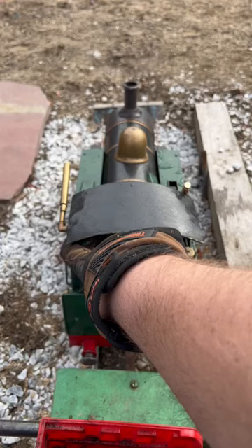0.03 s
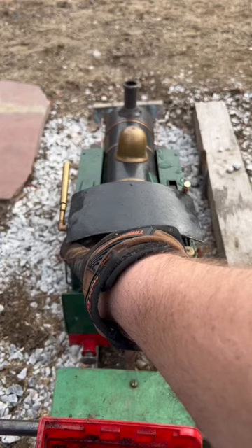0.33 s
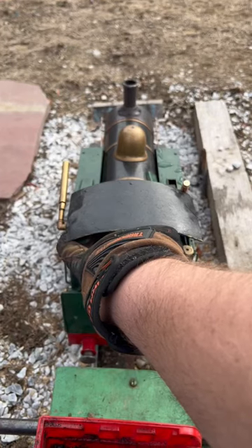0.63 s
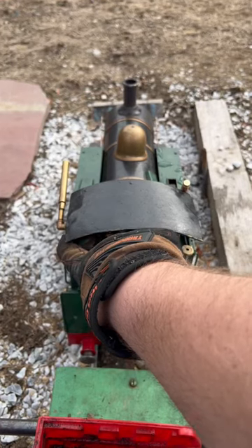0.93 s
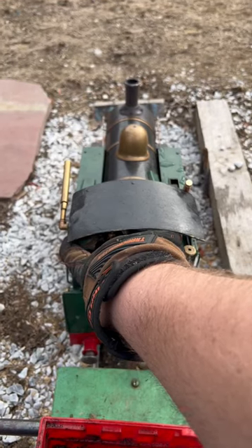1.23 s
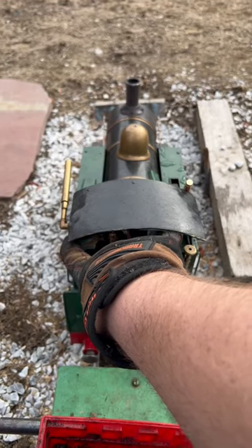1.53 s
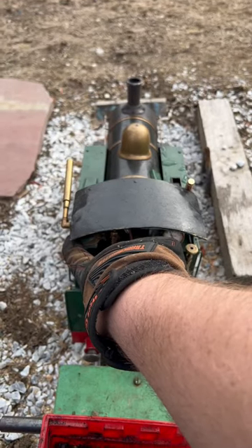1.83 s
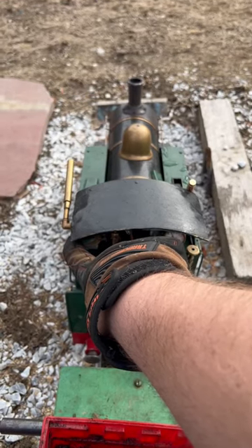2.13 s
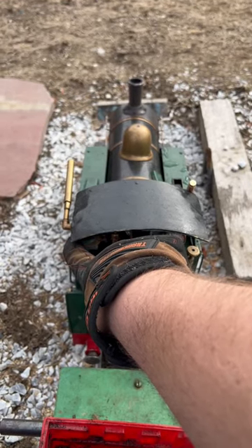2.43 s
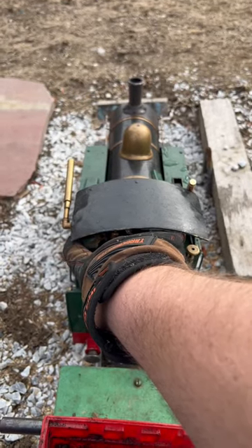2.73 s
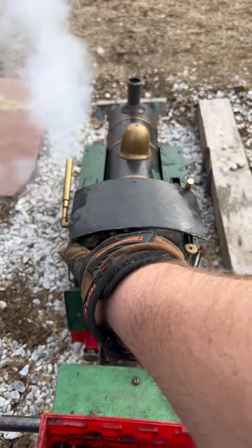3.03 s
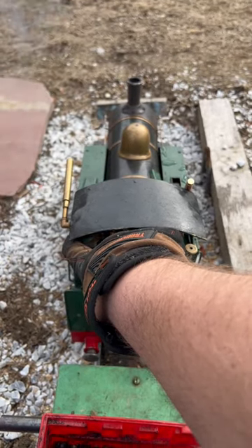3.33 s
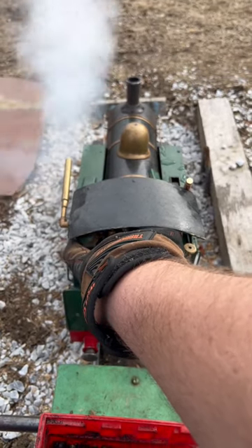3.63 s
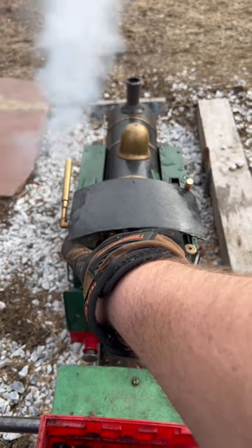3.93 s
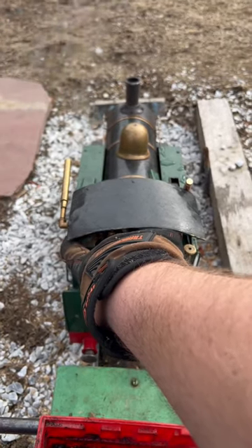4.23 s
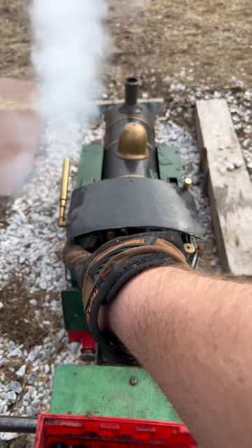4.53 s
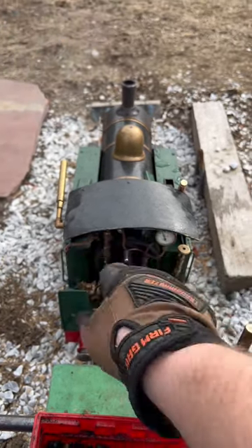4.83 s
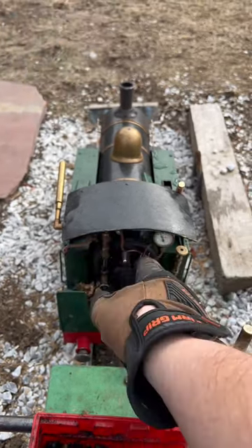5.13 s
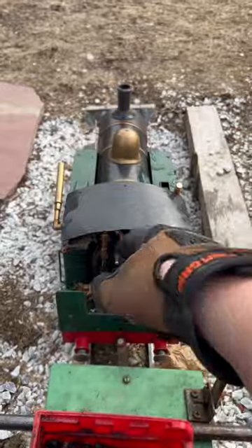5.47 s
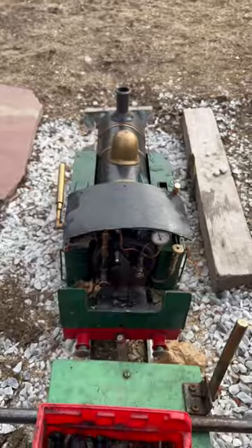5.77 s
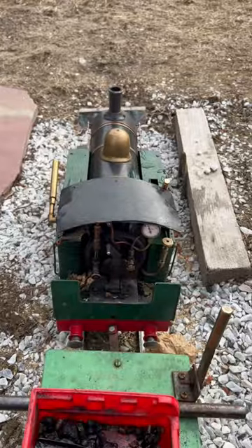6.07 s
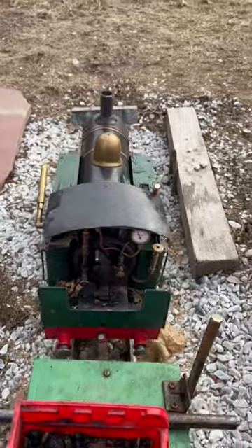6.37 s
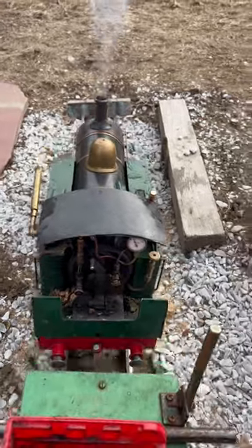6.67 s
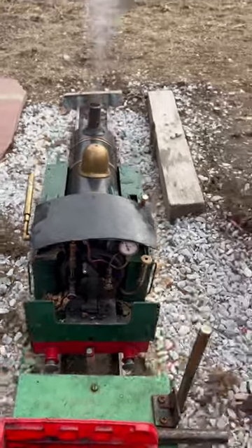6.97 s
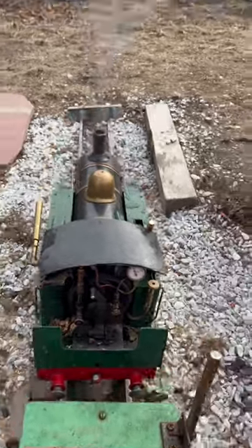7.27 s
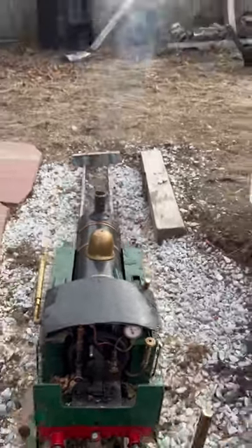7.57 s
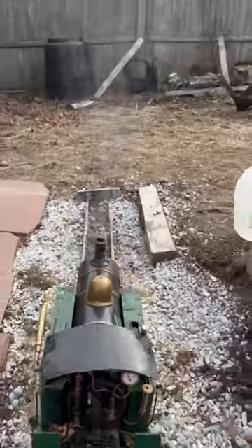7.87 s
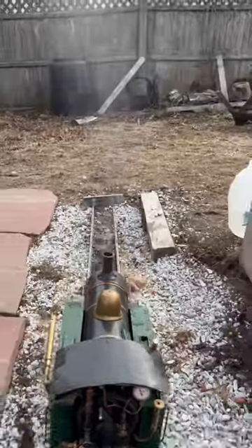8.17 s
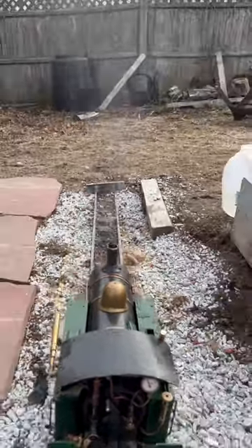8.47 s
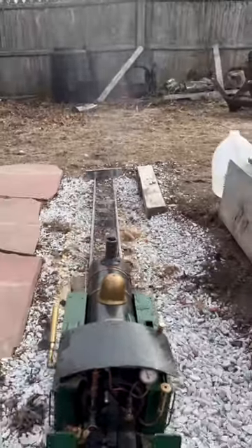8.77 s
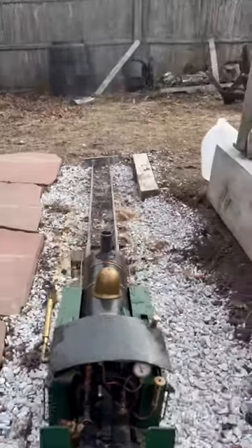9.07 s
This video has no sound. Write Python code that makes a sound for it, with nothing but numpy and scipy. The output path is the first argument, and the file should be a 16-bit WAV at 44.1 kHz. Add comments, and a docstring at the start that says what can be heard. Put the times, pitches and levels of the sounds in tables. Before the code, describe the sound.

A small steam locomotive gives three hissy, spluttering whistle blasts, then moves off with quickening chuffs.

```python
"""Back yard, from the driver's seat of a small live-steam locomotive: steam leaks, the fire draws.
Three pulls on a wet, overblown whistle each give a pip, a squeak and a spluttering breathy note
inside a loud hiss. Then the regulator opens: the chimney roars and the exhaust beats, in uneven
pairs, quicken as the engine moves off."""
import sys
import numpy as np
from scipy import signal
from scipy.fft import rfft, irfft, next_fast_len
from scipy.io import wavfile

SR = 44100
rng = np.random.default_rng(int(sys.argv[2]) if len(sys.argv) > 2 else 0)


def wav_record(signal):
    """Record a signal, one row per channel, as 16-bit PCM in the file named by sys.argv[1]."""
    frames = np.transpose(np.atleast_2d(signal))
    bounded = np.clip(frames, -1, 1)
    # unit amplitude maps onto the largest positive 16-bit level
    quanta = np.round(bounded * 32767).astype(np.int16)
    wavfile.write(sys.argv[1], SR, quanta)


N = 405719
T = np.arange(N) / SR
F = np.maximum(np.fft.rfftfreq(next_fast_len(N), 1 / SR), 1)

# whistle valve: (opens [s], water clears [s], shuts [s], flow level [dB])
PULLS = [(2.816, 2.885, 3.181, -25), (3.477, 3.53, 3.936, -24.3), (4.315, 4.395, 4.645, -24.5)]
LOW_MODE_HZ, HIGH_MODE_HZ = 1750, 4200  # whistle pipe


def undb(db):
    """Decibels to gain."""
    return 10 ** (np.asarray(db) / 20)


def curves(rows):
    """Table columns interpolated over time."""
    time_s, *columns = np.transpose(rows)
    return [np.interp(T, time_s, column) for column in columns]


def colour(points, modes=()):
    """Gain over frequency: broad spectrum plus narrow peaks and dips."""
    hz, db = np.transpose(points)
    broad_db = np.interp(np.log(F), np.log(hz), db)
    modes_db = sum(peak_db / (1 + (2 * (F - f) / width_hz) ** 2) for f, width_hz, peak_db in modes)
    return undb(broad_db + modes_db)


def shaped(x, gain):
    """Filter by a gain over frequency."""
    size = next_fast_len(N)
    return irfft(rfft(x, size) * gain, size)[..., :N]


def turbulence(gain):
    """Coloured stereo noise, rms 1: mono in the bass, wide in the treble."""
    # stereo width: (frequency [Hz], side minus mid [dB])
    width = [(90, -39), (380, -24.5), (700, -2), (1200, -15.5), (2400, -20), (4500, -3), (6800, -19),
             (8500, -8.5), (11500, 6), (13000, 42)]
    spread = colour(width)
    split = np.array([np.ones_like(spread), spread]) / np.hypot(1, spread)
    mid, side = shaped(rng.standard_normal((2, N)), gain * split)
    pair = np.array([mid + side, mid - side])
    return pair / pair.std()


def walk(rate_hz):
    """Smooth random drift, standard deviation 1."""
    x = shaped(rng.standard_normal(N), 1 / (1 + (F / rate_hz) ** 2))
    return x / x.std()


def ramp(t, rise_s):
    """Smooth 0-to-1 step from t = 0."""
    return np.sin(np.pi / 2 * np.clip(t / rise_s, 0, 1)) ** 2


def yard(x, near_db, far_db, near_t60_s, far_t60_s):
    """Nearby gravel scatters a short echo; fence and house return a thin, longer one."""
    t = T[:SR]
    tails = undb([-60 * t / near_t60_s, -60 * t / far_t60_s]) * ramp(t, rise_s=.008)
    near, far = tails / np.linalg.norm(tails, axis=1, keepdims=True)
    scatter = rng.standard_normal((2, SR)) * np.hypot(undb(near_db) * near, undb(far_db) * far)
    echo = signal.fftconvolve(x, scatter, axes=1)[:, :N]
    stone_hz, dull_hz = 750, 8000  # long waves pass small stones unscattered
    return x + shaped(echo, 1 / np.hypot(1, F / dull_hz) / np.hypot(1, stone_hz / F))


def simmer():
    """Steam leak, fire drawing through the flue, low hum, distant rumble."""
    # engine at rest: (time [s], leak [dB], hum [dB])
    levels = [(0, -58, -61.5), (2.1, -56.5, -63), (2.7, -56.5, -68.5), (4.2, -59.5, -72.5), (6.2, -59, -77)]
    # spectra: (frequency [Hz], level [dB])
    leak_spectrum = [(500, -21), (1500, -21.5), (2100, -15.5), (3000, -13), (4200, -8), (5500, -11),
                     (6250, -5), (7600, -9.5), (9000, -15.5), (10000, -26), (11200, -16), (15500, -30)]
    rumble_spectrum = [(20, -26.5), (45, -0.5), (90, 0), (160, -9), (500, -17), (2000, -50.5)]
    flue_spectrum = [(100, -8.5), (220, -10.5), (310, 4.5), (380, 3), (470, -15), (650, -26.5),
                     (2000, -42.5)]
    # leak peaks and dip: (frequency [Hz], width [Hz], gain [dB])
    leak_modes = [(2680, 260, 7.5), (3254, 500, -11), (3605, 220, 10), (6270, 440, 4.5)]
    leak_db, hum_db = curves(levels)
    leak = undb(leak_db + .4 * walk(rate_hz=6)) * turbulence(colour(leak_spectrum, leak_modes))
    draught = undb(-66.3 + 1.7 * walk(rate_hz=14)) * turbulence(colour(flue_spectrum))
    hum_rms = undb(hum_db + walk(rate_hz=4))
    hum_hz = 65 * (1 + .012 * walk(rate_hz=3))
    hum = np.sqrt(2) * hum_rms * np.sin(2 * np.pi * np.cumsum(hum_hz) / SR)
    rumble = undb(-66.5) * turbulence(colour(rumble_spectrum))
    return leak + draught + hum + rumble


def bumps():
    """Dull, quickly damped knocks at the controls."""
    # (time [s], pitch [Hz], relative level [dB], decay [s])
    knocks = [(1.881, 330, -48.5, .010), (2.207, 62.3, -49, 0.023), (2.434, 94, -42, 0.0082),
              (2.451, 69, -46, .018), (4.898, 358, -51, 0.03), (5.568, 339.6, -59.5, .015),
              (6.203, 300, -47, 0.0078)]
    out = np.zeros(N)
    for at_s, hz, db, decay_s in knocks:
        start = int(at_s * SR)
        t = T[start:] - at_s
        envelope = 2 * undb(db) * ramp(t, rise_s=.0065) * np.exp(-t / decay_s)
        out[start:] += envelope * np.sin(2 * np.pi * hz * t)
    return out * (1 + .5 * walk(rate_hz=120))


def beat_envelopes():
    """Each exhaust beat is a sharp puff and a slower tug at the fire."""
    # (time [s], level [dB])
    beats = [ (6.509, -44), (6.649, -42), (6.853, -46), (6.955, -43), (7.132, -46.5), (7.242, -37),
             (7.415, -39), (7.469, -37), (7.597, -36), (7.671, -33.5), (7.777, -33.5), (7.83, -37.5),
             (7.944, -35.5), (8.042, -36), (8.168, -36), (8.243, -33), (8.355, -36.5), (8.441, -30.5),
             (8.571, -34), (8.66, -31.5), (8.798, -31.5), (8.876, -29), (9.004, -30), (9.089, -29)]
    # the four strokes of a wheel turn empty at different speeds: (decay [s])
    decays_s = [.034, .028, .046, .031]
    puffs, tugs = np.zeros((2, N))
    for stroke, (at_s, db) in enumerate(beats):
        start = int(at_s * SR)
        t = T[start:] - at_s
        puffs[start:] += undb(db) * ramp(t, rise_s=.005) * np.exp(-t / decays_s[stroke % 4])
        tugs[start:] += undb(db - 8.5) * ramp(t, rise_s=.025) * np.exp(-t / .075)
    return puffs, tugs


def exhaust():
    """Puffs ring the chimney, steam blows through between beats, the flue roars."""
    # regulator open: (time [s], relative roar [dB], relative blow-through [dB])
    levels = [(6.42, -44.5, -54), (6.68, -39.5, -52), (7.35, -42, -48), (7.65, -44.5, -43.5),
              (8.1, -44, -44.5), (8.3, -40.5, -40.3), (8.54, -43, -42.5), (8.7, -36.5, -41.5),
              (9.2, -37, -40)]
    # spectra: (frequency [Hz], level [dB])
    puff_spectrum = [(35, -2), (100, 7.5), (600, -3), (1000, -2.5), (2000, -4), (3000, -5), (4000, 0.5),
                     (5000, -5), (6500, -2.5), (7600, -8), (9200, -16), (11000, -10), (12500, -17),
                     (15500, -22)]
    blow_spectrum = [(35, -4), (100, 1.5), (700, 9.5), (1500, 4), (2200, 2.5), (3000, -1.5), (4000, -3),
                     (5500, -2.5), (6600, -8.5), (7600, -9.5), (8800, -13), (9800, -18), (11300, -11),
                     (12500, -17), (15500, -18)]
    rush_spectrum = [(100, -1), (700, 1), (1500, -2.5), (2200, -1), (2900, -9), (3500, -4), (4100, 5.5),
                     (5400, -7), (6600, 2.5), (7400, -8), (7900, -4), (8900, -12), (9700, -22),
                     (11300, -16), (13000, -28)]
    roar_spectrum = [(30, -46), (45, -24), (70, -16.5), (120, -15), (200, -12), (290, -1), (400, 0.5),
                     (470, -11.5), (580, -23.5), (1000, -29.5), (3000, -97)]
    # chimney modes under puffs, and peaks of the steady blow-through: (frequency [Hz], width [Hz], gain [dB])
    puff_modes = [(770, 100, 8.5), (1090, 160, 5), (1600, 160, 4.5), (2240, 150, 7.5), (2370, 58, -4.5),
                  (2780, 230, 7.5), (3130, 160, 9.5), (3490, 81, -6.5), (3795, 250, 9), (4120, 160, 5),
                  (4650, 220, 8), (5820, 220, 7), (6430, 200, 6)]
    blow_modes = [(2750, 200, 3), (3070, 170, 7), (3350, 200, -6), (3730, 200, 8), (4080, 150, 10),
                  (6660, 220, 11.5), (7850, 250, 5), (8750, 300, 5)]
    open_s, fill_s = 6.229, .16
    roar_db, blow_db = curves(levels)
    regulator = ramp(T - open_s, rise_s=.0067)
    puffs, tugs = beat_envelopes()
    chuffs = puffs * undb(walk(rate_hz=56)) * turbulence(colour(puff_spectrum, puff_modes))
    through_flow = regulator * undb(blow_db - 1.5 + walk(rate_hz=140))
    blow = through_flow * turbulence(colour(blow_spectrum, blow_modes))
    # steam rushes into the cold cylinders, fading as they fill
    filling = regulator * undb(-39.5) * np.exp(-(np.maximum(T - open_s, 0) / fill_s) ** 2)
    rush = filling * turbulence(colour(rush_spectrum))
    # every flow up the chimney adds draught
    draught = np.sqrt((regulator * undb(roar_db - 1)) ** 2 + tugs ** 2 + (1.05 * filling) ** 2)
    roar = draught * undb(.85 * walk(rate_hz=20)) * turbulence(colour(roar_spectrum))
    return chuffs + blow + rush + roar


def whistle_jet():
    """Steam hisses over the lip at once; breathy pipe resonances join once the water is blown out."""
    # bare jet and pipe-coloured breath: (frequency [Hz], level [dB])
    jet_spectrum = [(100, -18.5), (300, -18.5), (520, -24), (1000, -13), (1400, -11), (2200, -6),
                    (3500, 2.5), (4400, -1), (5500, 3.5), (7000, -1.5), (9000, -1), (10800, 1.5),
                    (12200, 1), (12900, -8.5), (15500, -13.5)]
    breath_spectrum = [(700, -43), (1600, -19), (2100, -8), (2700, 5), (3300, -8.5), (4500, -16),
                       (5700, -4.5), (7100, -3), (8200, -8), (10000, -10.5), (13000, -18)]
    # upper pipe resonances and gaps between: (frequency [Hz], width [Hz], gain [dB])
    modes = [(5830, 270, 11.3), (6620, 240, 13), (7110, 300, 9), (7960, 240, 11)]
    dips = [(2170, 120, -4), (4370, 160, -3), (6330, 190, -9), (7520, 200, -7), (9500, 400, -4)]
    flow, breath = 0, 0
    for opens_s, clears_s, shuts_s, db in PULLS:
        closing = np.exp(-np.maximum(T - shuts_s, 0) / .009)
        valve = undb(db) * ramp(T - opens_s + .005, rise_s=.028) * closing
        flow += valve
        breath += valve * ramp(T - clears_s, rise_s=.057)
    hiss = undb(-5.5 + .9 * walk(rate_hz=40)) * flow * turbulence(colour(jet_spectrum, dips))
    breath *= undb(-3.8 + 2.2 * walk(rate_hz=35))
    return hiss + breath * turbulence(colour(breath_spectrum, modes + dips))


def pipe(hz, gain, max_rough=1):
    """Pipe tone: the weaker it is, the looser its lock and the more eddies and droplets roughen it."""
    flutter, rasp, upper_flutter = (
        (walk(rate_hz) + 1j * walk(rate_hz)) / np.sqrt(2) for rate_hz in (220, 560, 260))
    locked_db, rasp_gain, upper_ratio, upper_db = -16, .55, 2.45, -10
    weakness_db = np.maximum(locked_db - 20 * np.log10(gain + 1e-9), 0)
    rough = np.minimum(.14 + .07 * weakness_db, max_rough)
    jitter = (.010 + .015 * rough) * walk(rate_hz=240)
    phase = 2 * np.pi * np.cumsum(hz * (1 + jitter)) / SR
    shake = (flutter + rasp_gain * rasp) / np.hypot(1, rasp_gain)
    tone = (np.sqrt(1 - rough ** 2) + rough * shake) * np.exp(1j * phase)
    # a loose lock lets an inharmonic mode ring above the lower notes
    upper = rough * upper_flutter * np.exp(1j * upper_ratio * phase) / np.hypot(1, (hz / 3200) ** 8)
    return np.sqrt(2) * gain * (tone + undb(upper_db) * upper).real


def mode_envelope(at_s, length_s, hz, ring_s=.004):
    """A mode grows per cycle, so low ones speak slowly; it saturates, holds, rings down."""
    growth_cycles = 4.5
    growth = .5 + .5 * np.tanh((T - at_s - .003) * hz / (2 * growth_cycles))
    return growth * np.exp(-np.maximum(T - at_s - length_s, 0) / ring_s)


def squeaks():
    """Full pressure overblows the pipe: each squeak starts sharp and sags."""
    # (time [s], length [s], first pitch [Hz], settled pitch [Hz], level [dB])
    overblows = [(2.836, .014, 3720, 3510, -8.5), (3.495, .014, 4300, 3270, -10),
                 (4.331, .013, 3850, 3330, -12), (4.363, .015, 3310, 3200, -14)]
    sag_s = .0055
    hz, gain = np.full(N, float(HIGH_MODE_HZ)), 0
    for at_s, length_s, first_hz, settled_hz, db in overblows:
        sag_hz = settled_hz + (first_hz - settled_hz) * np.exp(-np.maximum(T - at_s, 0) / sag_s)
        hz = np.where(T > at_s - sag_s, sag_hz, hz)
        gain += undb(db) * mode_envelope(at_s, length_s, settled_hz, ring_s=.009)
    return pipe(hz, gain)


def held_notes(choked):
    """The main note sinks as the pipe clears and drops out where water chokes it."""
    # one curve per pull: (time [s], pitch [Hz], level [dB])
    notes = [
        [(2.918, 2880, -26), (2.936, 2880, -24), (2.946, 2900, -36), (2.988, 2710, -27), (3.022, 2480, -29),
         (3.038, 2510, -18), (3.068, 2480, -31), (3.104, 2420, -17), (3.18, 2460, -21)],
        [(3.558, 2860, -29), (3.582, 2880, -19), (3.592, 2880, -32), (3.606, 2940, -21), (3.624, 2530, -33),
         (3.666, 2380, -16), (3.676, 2440, -29), (3.746, 2560, -17), (3.808, 2400, -24), (3.818, 2400, -16),
         (3.85, 2450, -26), (3.935, 2760, -25)],
        [(4.405, 3030, -30), (4.409, 3040, -27), (4.427, 2860, -40), (4.447, 2690, -27), (4.507, 2660, -23),
         (4.537, 2600, -28), (4.551, 2590, -22), (4.569, 2540, -32), (4.587, 2240, -36), (4.597, 2280, -25),
         (4.645, 2250, -21)],
    ]
    hz, gain = np.full(N, float(LOW_MODE_HZ)), 0
    for (opens_s, _, shuts_s, _), rows in zip(PULLS, notes):
        note_hz, db = curves(rows)
        start_s = rows[0][0]
        hz = np.where(T > opens_s, note_hz, hz)
        gain += undb(db) * mode_envelope(start_s, shuts_s - start_s, note_hz)
    return pipe(hz, gain * np.clip(1 - choked, 0, 1))


def whistle_tone():
    """The first weak flow pips the lowest mode; squeak and held note follow, broken by spits."""
    # water slugs throw the pipe into its high and low modes: (time [s], length [s], level [dB])
    slugs = [(2.888, .026, -28.5), (2.94, .014, -31), (3.615, .015, -26.5), (4.396, .005, -26),
             (4.419, .014, -24.5)]
    # balance at the ears: (frequency [Hz], left minus right [dB])
    pan = [(1700, 0.5), (2450, 1.2), (2900, 2.5), (3450, -3.8), (4200, 1)]
    pips = sum(mode_envelope(opens_s + .009, length_s=.0062, hz=LOW_MODE_HZ) for opens_s, *_ in PULLS)
    choked, spits = 0, 0
    for at_s, length_s, db in slugs:
        slug = mode_envelope(at_s, length_s, HIGH_MODE_HZ)
        choked += slug
        spits += undb(db) * slug
    low = pipe(LOW_MODE_HZ, undb(-16.5) * pips + undb(-13) * spits, max_rough=.25)
    high = pipe(HIGH_MODE_HZ, spits)
    tone = low + high + squeaks() + held_notes(choked)
    left_lag_s = 2e-5
    tilt = np.sqrt(colour(pan)) * np.exp(-1j * np.pi * F * left_lag_s)
    radiated = 1 / np.hypot(1, (1450 / F) ** 5)  # little escapes below the lowest mode
    return shaped(tone, radiated * np.array([tilt, 1 / tilt]))


def scene():
    """The engine in its yard."""
    engine = whistle_tone() + whistle_jet() + exhaust()
    return yard(engine, near_db=-16.5, far_db=-34, near_t60_s=.16, far_t60_s=.55) + simmer() + bumps()


def record(dry):
    """Microphone ports notch the treble; deep bass and top are cut."""
    notch_hz, width_hz, notch_db = 4970, 300, -12
    bottom_hz, top_hz = 38, 15800
    notch = undb(notch_db / (1 + (2 * (F - notch_hz) / width_hz) ** 2))
    low_cut = 1 / np.hypot(1, (bottom_hz / F) ** 4)
    high_cut = signal.ellip(8, .2, 70, top_hz, fs=SR, output="sos")
    return signal.sosfilt(high_cut, shaped(dry, notch * low_cut))


dry = scene()
out = record(dry)
wav_record(out)
```